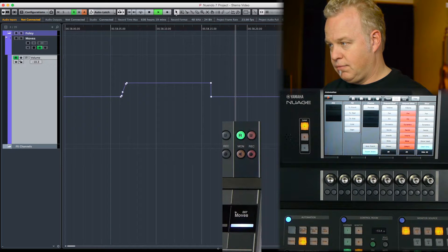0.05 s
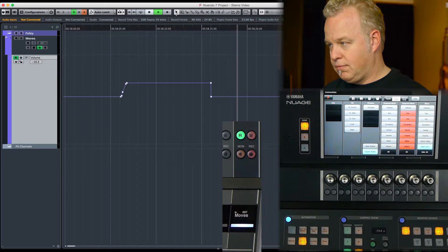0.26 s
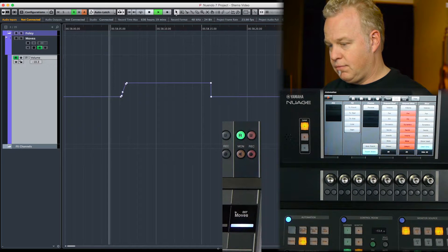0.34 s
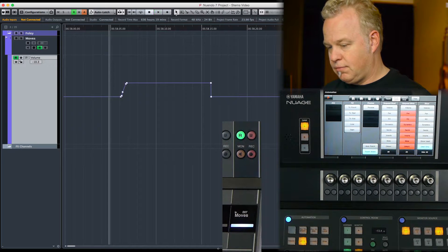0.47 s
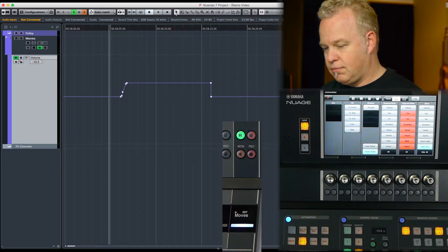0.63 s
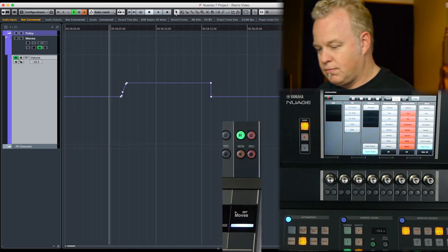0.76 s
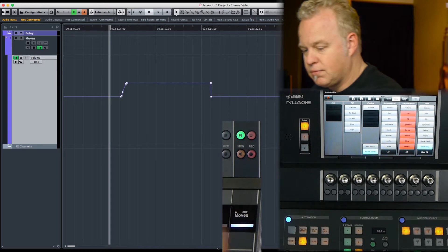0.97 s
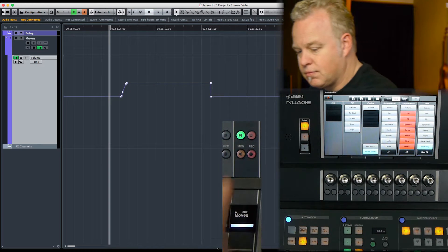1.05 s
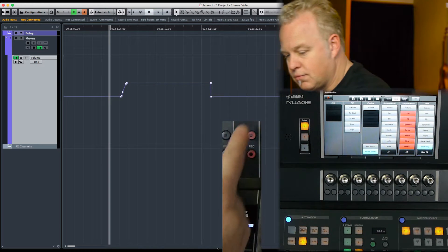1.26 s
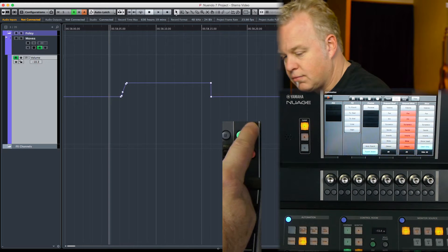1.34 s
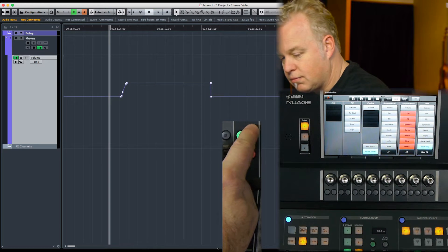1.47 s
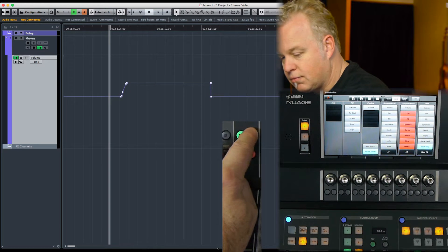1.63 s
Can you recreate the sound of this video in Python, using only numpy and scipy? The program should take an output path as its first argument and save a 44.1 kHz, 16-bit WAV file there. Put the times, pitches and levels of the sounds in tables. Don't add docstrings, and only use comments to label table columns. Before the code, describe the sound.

A mixing desk button is pressed: faint fan hum first, then at 0.24 s a loud, bright plastic snap with a tiny rattle and short panel ring. At 0.42 s the cap returns with a weaker, looser click. A dull fingertip pat lands at 0.64 s, then faint sleeve rustling until about 1.45 s, with barely audible low floor thumps. Close microphone, small damped studio, brief reflections.

```python
import sys
import numpy as np
from scipy import signal
from scipy.fft import rfft, irfft, next_fast_len
from scipy.io import wavfile
from scipy.ndimage import map_coordinates

SR = 44100
rng = np.random.default_rng(int(sys.argv[2]) if len(sys.argv) > 2 else 0)


def inscribe(sig):
    pcm = np.round(np.clip(np.atleast_2d(sig).T, -1, 1) * 32767)
    wavfile.write(sys.argv[1], SR, pcm.astype(np.int16))


def volts_from_db(level):
    exponent = np.asarray(level, float) / 20
    return 10 ** exponent


N = 74970


def unit(x):
    return x / np.sqrt(np.mean(x ** 2) + 1e-20)


def along(points, hz):
    point_hz, value = np.transpose(points)
    return np.interp(np.log(hz + 1), np.log(point_hz + 1), value)


def noise(gain_db):
    length = next_fast_len(N)
    spectrum = rfft(rng.standard_normal(length))
    gain = volts_from_db(gain_db(np.fft.rfftfreq(length, 1 / SR)))
    return unit(irfft(spectrum * gain, length)[:N])


def wobble(rate):
    points = rng.standard_normal(int(N * rate / SR) + 4)
    return map_coordinates(points, [np.arange(N) * rate / SR])


def burst(peak_s, rise_s, t60_s):
    t = np.arange(N) / SR - peak_s
    rise = np.exp(np.minimum(t, 0) / rise_s)
    decay = volts_from_db(-60 * np.maximum(t, 0) / t60_s)
    return np.where(t < 0, rise, decay)


def ring(modes, attack_s, turn):
    t = np.arange(SR // 2) / SR
    tones = [volts_from_db(db - 60 * t / t60) * np.sin(2 * np.pi * hz * t) for hz, db, t60 in modes]
    return (sum(tones[::2]) + turn * sum(tones[1::2])) * (1 - np.exp(-t / attack_s))


def blows(rows):
    t = np.arange(N) / SR
    width_s = 0.00026 / 8
    pushes = sum(volts_from_db(db) * np.exp(-.5 * ((t - s) / width_s) ** 2) for s, db in rows)
    return pushes / (width_s * SR * np.sqrt(2 * np.pi))


def low_cut(x, hz):
    return signal.sosfilt(signal.butter(2, hz, "high", fs=SR, output="sos"), x)


def air():
    # pitch_hz [Hz], level_db [dB]
    air_colour = [(25, -9), (230, -8.5), (480, -13), (1000, -22), (2600, -32), (4800, -29), (6500, -35),
                  (16000, -47)]
    # pitch_hz [Hz], level_db [dB]
    fan_tones = [(153, -80), (229, -79), (540, -83.5)]
    t = np.arange(N) / SR
    hum = np.zeros(N)
    for hz, db in fan_tones:
        loudness = volts_from_db(db + 4 + 2.5 * wobble(22))
        hum += loudness * np.sin(2 * np.pi * hz * t + 1.8 * wobble(7.2))
    rush = volts_from_db(-69 + 1.4 * wobble(15)) * noise(lambda hz: along(air_colour, hz))
    return rush + hum


def floor_thumps():
    # peak_s [s], level_db [dB], t60_s [s], centre_hz [Hz]
    thumps = [
        (.27, -53, 0.53, 91),
        (.82, -65.5, 0.77, 55),
        (.98, -67, .4, 50.35),
        (1.13, -73, .3, 55),
    ]
    out = np.zeros(N)
    for s, db, t60, hz in thumps:
        lump = noise(lambda f: -10 * np.log2((f + 1) / hz) ** 2)
        out += volts_from_db(db) * burst(s, .015, t60) * lump
    return out


def room(x):
    # pitch_hz [Hz], t60_s [s]
    near_walls = [(200, .16), (600, .14), (2000, .11), (6000, .12), (10000, .12), (14000, 0.054)]
    # pitch_hz [Hz], t60_s [s]
    far_corners = [(200, .4), (2000, 0.24), (6000, .33), (14000, .28)]
    hz, t, bands = signal.stft(np.array([x, rng.standard_normal(N)]), SR, nperseg=128)
    source, hiss = bands
    early = volts_from_db(-60 * t / along(near_walls, hz)[:, None])
    late = volts_from_db(-14.5 - 60 * t / along(far_corners, hz)[:, None])
    fall = (early + late) ** 2
    fall = fall / fall.sum(axis=1, keepdims=True)
    fall = np.pad(fall, ((0, 0), (2, 0)))
    energy = abs(signal.fftconvolve(abs(source) ** 2, fall, axes=1))[:, :len(t)]
    answer = hiss * np.sqrt(energy / np.mean(abs(hiss) ** 2))
    return signal.istft(answer, SR, nperseg=128)[1][:N]


def sleeve():
    # start_s [s], peak_s [s], end_s [s], level_db [dB], centre_hz [Hz]
    strokes = [
        (.4, .62, 1.27, -73.5, 2800),
        (0.711, 0.862, 1.43, -72.5, 4480),
        (0.962, 1.07, 1.36, -77.5, 12000),
        (0.703, 1.241, 1.48, -71, 736),
        (0.936, 1.132, 1.416, -71.5, 4200),
        (1.171, 1.28, 1.45, -68.5, 2850),
    ]
    t, out = np.arange(N) / SR, np.zeros(N)
    for start, peak, end, db, hz in strokes:
        cloth = noise(lambda f: -6 * (np.log2((f + 1) / hz) / 1.1) ** 2)
        grain = volts_from_db(0.6 * (wobble(200) + 0.27 * wobble(35)))
        swell = np.sin(np.pi / 2 * np.interp(t, [start, peak, end], [0, 1, 0])) ** 2
        out += volts_from_db(db) * swell * unit(grain * cloth)
    return out


def finger():
    # peak_s [s], level_db [dB], t60_s [s]
    pats = [
        (.636, -50.5, 0.052),
        (0.645, -58.5, .06),
        (0.655, -58.5, 0.21),
    ]
    # pitch_hz [Hz], level_db [dB]
    pat_colour = [(150, -18), (250, -9), (600, -1), (1000, -5.5), (1500, -8), (2200, -19), (3500, -37),
                  (8000, -41)]
    loudness = sum(volts_from_db(db) * burst(s, 0.0014, t60) for s, db, t60 in pats)
    return loudness * noise(lambda hz: along(pat_colour, hz))


def panel():
    # time_s [s], level_db [dB]
    shakes = [
        (.2425, 2),
        (.4212, -4.5),
        (.634, -35),
    ]
    # pitch_hz [Hz], level_db [dB], t60_s [s]
    panel_tones = [(165, -38.5, .25), (245, -26, .15), (285, -27.5, .08), (319.5, -17, 0.087),
                   (372.9, -28.5, .08), (463, -19, .07), (497, -28.5, .12), (530, -37.5, .25),
                   (546, -43.5, .9), (640, -33, .12), (1590, -47.5, 0.48), (2100, -48.5, .2)]
    return signal.fftconvolve(blows(shakes), ring(panel_tones, .0025, -1))[:N]


def cap_rattle():
    # peak_s [s], level_db [dB], rise_s [s], t60_s [s]
    rattles = [
        (0.2366, -15, 0.00042, 0.033),
        (0.2385, -17, 0.00056, .015),
        (0.368, -55, 0.00087, 0.013),
        (.4006, -40, 0.0003, 0.087),
        (0.4117, -28.5, .0006, .02),
        (0.4205, -24, 0.0011, .03),
        (0.4327, -30, 0.00083, 0.016),
        (0.4557, -37.5, .005, 0.012),
    ]
    # pitch_hz [Hz], level_db [dB]
    rattle_colour = [(500, -34.5), (1300, -14.5), (2200, -4.5), (4400, 1), (6000, -3.5), (10000, -9.5),
                     (15500, -19), (16500, -41)]
    loudness = sum(volts_from_db(db) * burst(s, rise, t60) for s, db, rise, t60 in rattles)
    return loudness * noise(lambda hz: along(rattle_colour, hz))


def cap_stops():
    # time_s [s], level_db [dB]
    press = [
        (.2422, 0),
        (.2427, -3.5),
        (.2447, -11.5),
        (0.2455, -13),
        (0.2474, -11.5),
    ]
    # time_s [s], level_db [dB]
    release = [
        (.4195, -23),
        (.4207, -13),
        (0.4221, -15),
        (0.4243, -20),
        (0.4263, -28),
    ]
    # pitch_hz [Hz], level_db [dB], t60_s [s]
    down_tones = [(850, -11.5, 0.035), (1200, -14, .02), (1603, -10, 0.0094), (2020, -1.5, 0.019),
                  (2400, -7, 0.0082), (2900, 2, .012), (3480, -5.5, .014), (4200, -9, .012),
                  (5100, -9.5, 0.02), (6150, -10.5, .014), (7500, -18, .01), (9700, -19.5, .01)]
    # pitch_hz [Hz], level_db [dB], t60_s [s]
    up_tones = [(762, -9.5, 0.026), (1090, -3.5, 0.03), (1490, -9.5, 0.025), (1550, -11, 0.015),
                (1960, 2.5, 0.0087), (2790, -9.5, 0.029), (3340, -1, 0.0098), (4540, 0, .01),
                (5700, 1, 0.01), (6150, -5, 0.014), (8100, -16.5, 0.00993)]
    # pitch_hz [Hz], level_db [dB]
    crack_colour = [(300, -28.5), (1000, -4.5), (2500, 5), (5000, -5), (10000, -11), (15500, -16.5),
                    (16500, -41.5)]
    crack_loudness = sum(volts_from_db(db - 11.5) * burst(s, 1e-4, 0.016) for s, db in press + release)
    crack = crack_loudness * noise(lambda hz: along(crack_colour, hz))
    down = signal.fftconvolve(blows(press), volts_from_db(-5.5) * ring(down_tones, 5e-5, 0.96))
    up = signal.fftconvolve(blows(release), volts_from_db(-3.5) * ring(up_tones, 1e-4, -1.24))
    return crack + down[:N] + up[:N]


def scene():
    near = low_cut(cap_rattle() + cap_stops() + panel() + finger(), 310)
    answer = low_cut(low_cut(room(near), 180), 180)
    return (near + volts_from_db(-9) * answer + sleeve() + floor_thumps() + air())[None]


def top_cut(x):
    return signal.sosfilt(signal.butter(12, 16810, fs=SR, output="sos"), x)


def record(dry):
    x = signal.sosfilt(signal.butter(10, 16200, fs=SR, output="sos"), dry)
    return top_cut(np.clip(x, -1, 1))


dry = scene()
out = record(dry)
inscribe(out)
```